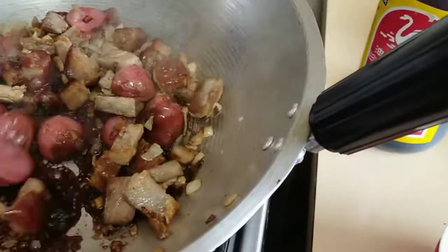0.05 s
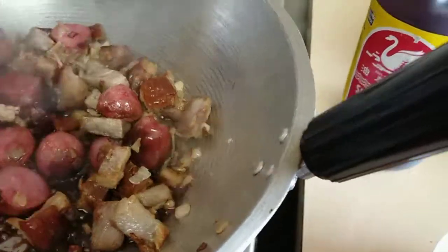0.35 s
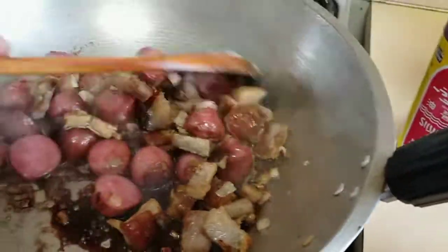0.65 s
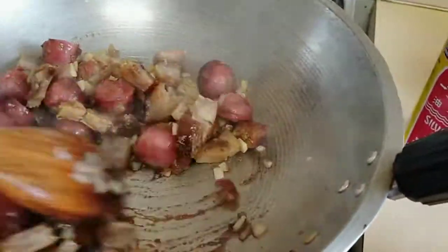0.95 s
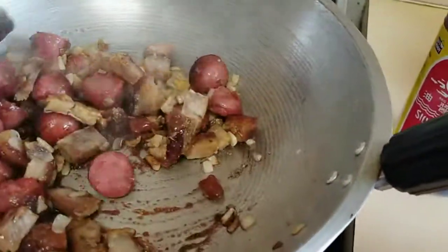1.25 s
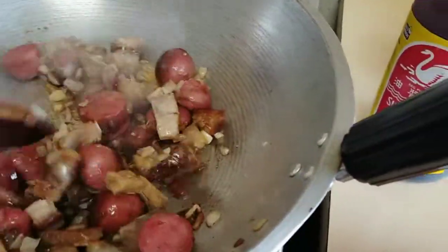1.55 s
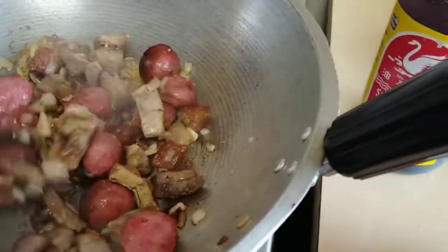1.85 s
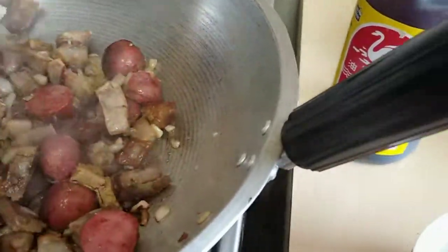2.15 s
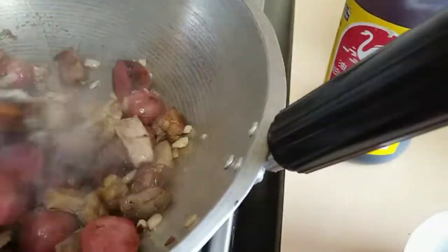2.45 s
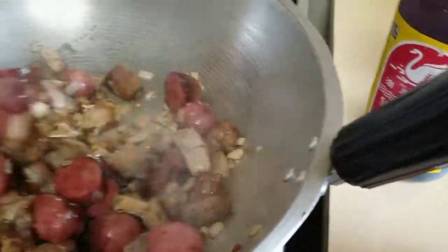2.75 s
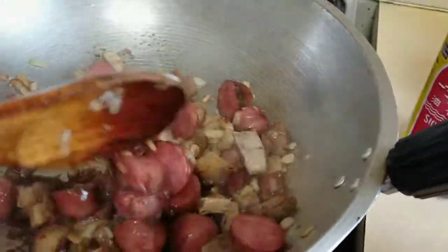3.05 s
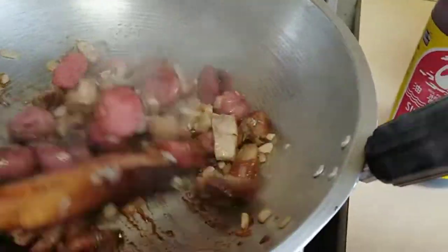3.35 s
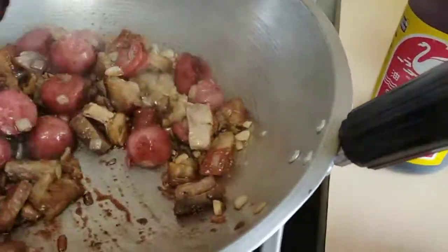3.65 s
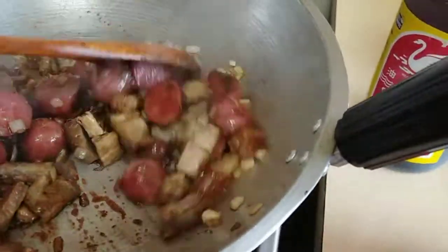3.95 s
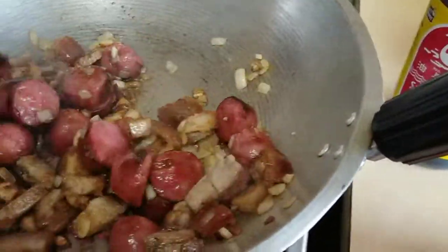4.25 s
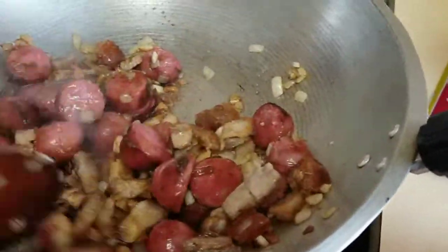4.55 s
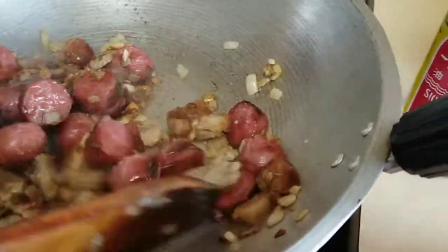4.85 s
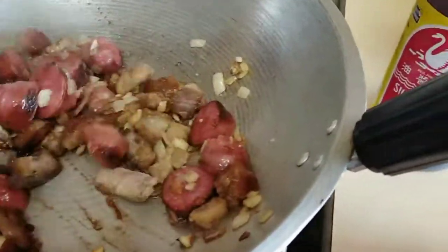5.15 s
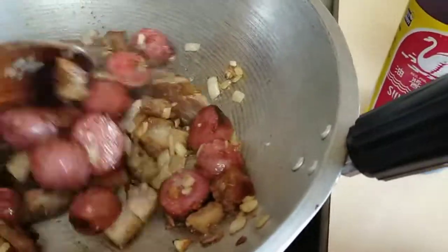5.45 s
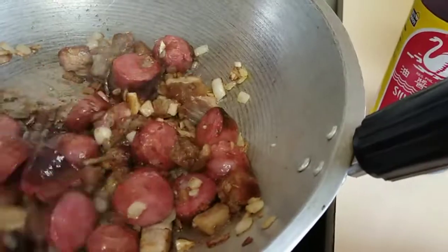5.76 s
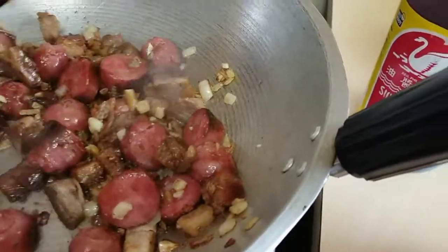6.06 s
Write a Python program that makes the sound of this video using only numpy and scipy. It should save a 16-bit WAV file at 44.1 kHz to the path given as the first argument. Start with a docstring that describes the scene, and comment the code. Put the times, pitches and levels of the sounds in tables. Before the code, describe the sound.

Close, slowly softening frying in a wok, with a wooden spatula stirring and clacking against the metal about twice a second.

```python
"""A small kitchen, a phone held close over a metal wok of frying meat, sausage and onion.
From the start, countless steam bubbles burst in the oil, and now and then a drop spits. From half a
second in, a wooden spatula knocks on the pan about twice a second and pushes the food along; the wok
rings briefly and rumbles on its burner. The frying dies down as the food is turned, and in the last
two seconds the spatula's edge rasps twice over bare metal. The house murmurs faintly throughout."""
import sys
import numpy as np
from scipy import signal
from scipy.fft import rfft, irfft, next_fast_len
from scipy.io import wavfile
from scipy.ndimage import uniform_filter1d

SR = 44100
rng = np.random.default_rng(int(sys.argv[2]) if len(sys.argv) > 2 else 0)


def materialize(psi):
    """Save the field psi as 16-bit PCM at rate SR to the path in sys.argv[1].

    A 1-D psi becomes a single channel; in a 2-D psi each row is a channel.
    """
    bounded = np.clip(np.atleast_2d(psi).T, -1, 1)
    quanta = np.round(bounded * 32767).astype(np.int16)
    wavfile.write(sys.argv[1], SR, quanta)


N = 277389
TIME = np.arange(N) / SR

# Source levels are relative, ahead of the microphone. Balance is left minus right.
# The frying dying down. Each row: time in seconds, crackle level in dB, fizz balance in dB.
FRYING_LEVELS = [(0.0, -32.5, 0), (0.52, -32.5, -2), (1.23, -33, 3.5), (1.54, -36, 1.5),
                 (2.35, -37.5, -0.5), (3.24, -38, 0), (3.36, -37.5, -0.5), (4.87, -39.5, 1),
                 (4.99, -39, -1), (6.29, -39.5, 2.5)]
# Fresh food meets hot metal and the fizz surges.
# Each row: start in seconds, length in seconds, boost in dB, shift to the left in dB.
FIZZ_SURGES = [(0.0, 0.055, 1, 0), (0.294, 0.22, 2, 0), (1.082, 0.3, 1, -1.5), (1.88, 0.12, 3, 0),
               (2.082, 0.38, 3, -0.5), (2.537, 0.23, 2.5, 0.5), (3.353, 0.63, 2, 0), (4.894, 0.11, 2, 2),
               (5.194, 0.22, 2.5, 1), (5.83, 0.22, 1.5, -2.5), (6.08, 0.15, 3.5, -2)]
# Large bubbles, then tiny ones. Each row: lower and upper band edge in Hz, bursts a second,
# spread of sizes in dB, direct sound against echo in dB, lag at the left port in ms.
LARGE_BUBBLES = [(20, 1950, 2200, 2, 1.5, 0.26), (1340, 3450, 3500, 1, -8.5, 0.32)]
TINY_BUBBLES = [(3470, 7100, 7000, 1.5, -6, 0.575), (6460, 9700, 7000, 2.6, -1.5, 0.552),
                (9250, 22600, 13000, 0.76, -5, 0.594)]
# The colour of bursting bubbles. Each row: frequency in Hz, level in dB.
BUBBLE_SPECTRUM = [(60, -61), (200, -44), (310, -17.5), (480, -15.5), (620, -6), (820, -4.5), (1150, 0.5),
                   (1400, -2.5), (2300, 0), (3200, 0), (3900, -2.5), (7500, -2.5), (10300, -9.5),
                   (15500, -11)]
# The hollow of the bowl, heard in the frying. Each row: centre in Hz, width in Hz, boost in dB.
BOWL_RESONANCES = [(630, 17, 8), (1056, 170, 2.5), (1755, 16, 2), (2465, 170, 2)]
# The spatula's blows. Each row: start in seconds, clack level in dB, hardness in Hz, ring of the low,
# middle, high and top modes in dB, t60 of the food's damping in seconds, bounce delay in seconds,
# bounce against first blow in dB, balance in dB.
SPATULA_KNOCKS = [ (0.4603, -27, 655, -55, -55, -60, -60, .5, 0.019, -4.5, 1.6),
                  (0.739, -30, 800, -52, -54, -60, -60, 0.46, 0.0083, -3.5, 1.6),
                  (1.2703, -19, 1180, -41, -48, -58, -60, .4, 0.0063, -13, 2.8),
                  (1.7070, -21.5, 2340, -37.5, -26.5, -25, -24, 0.26, 0.0051, -6, 4.2),
                  (2.1980, -33, 520, -49, -61, -60, -60, .5, .009, -8, 1),
                  (2.678, -22.5, 1100, -43, -46, -56, -60, 0.54, 0.0067, -19, 0.85),
                  (3.1875, -19, 2110, -40.5, -37, -29.5, -44, 1.4, .007, -9, 6.1),
                  (3.68, -23, 1180, -50, -62, -60, -60, .5, .007, -28, 1.4),
                  (4.393, -19.5, 2480, -35.5, -23.5, -35.5, -17.5, 2.1, .006, -6, 3.9),
                  (4.7960, -49.5, 338, -53, -49, -60, -60, 0.55, .02, 1, 1),
                  (5.256, -24, 1230, -42, -39, -58, -60, 1.3, .005, -5, 3.5),
                  (5.6935, -17.5, 3200, -50, -51, -58, -44, .3, .0065, -5.5, 5.5),
                  (6.1400, -51, 350, -60, -60, -58, -60, .5, .02, 3, 1)]
# Wood on metal, choked by the contact. Each row: frequency in Hz, level in dB, t60 in seconds.
CLACK_MODES = [(245, -12.5, 0.21), (658, -3.5, 0.093), (780, -25, 0.034), (1044, -13, 0.034),
               (1470, -51, 0.024), (2000, 8, 0.016), (2150, 0, 0.018), (2360, 5.5, 0.051),
               (2480, -20, 0.018), (3470, -22, 0.011)]
# The wok, damped by the food. Each row: frequency in Hz, level in dB, t60 in seconds.
WOK_MODES = [(116.3, -17, 0.92), (231, -2, 0.46), (317, -11.5, 0.97), (448, 1, 0.66), (606, -6.5, 0.54),
             (644, -5, 0.31), (724, 0.5, 0.28), (885, -3, 0.35), (961, 3, 0.37), (1378, 0, 0.23),
             (1560, -11, 0.088), (1846, 6.5, 0.44), (2020, -19, .13), (2310, -9, 0.091), (2372, -5, 0.17)]
# Drops that spit. Each row: start in seconds, level in dB, t60 in seconds, balance in dB.
SPITTING_DROPS = [(0.114, -8.5, .002, 1), (0.3638, -18, 0.0022, -5), (0.513, -22, .002, 0),
                  (1.9043, -17, .002, -2), (2.814, -23, .002, 1), (4.393, -19.5, 0.2, 3),
                  (4.854, -21, 0.0012, 2), (6.108, -26, .002, 0)]
# Pushing the food. Each row: start in seconds, length in seconds, rumble in dB, scrape in dB.
SPATULA_STROKES = [(-.05, 0.18, -57, -43.5), (.46, 0.15, -66, -46.5), (.74, 0.34, -77, -51.5),
                   (1.27, 0.095, -60, -42.5), (1.712, 0.17, -59, -48.5), (2.186, 0.064, -66, -52),
                   (2.505, .07, -73, -53), (2.677, 0.14, -62, -44), (3.145, 0.071, -57, -45),
                   (3.33, .12, -81, -56), (3.676, 0.19, -57.5, -49), (4.373, 0.16, -58.5, -47),
                   (4.79, 0.087, -60.5, -53), (5.263, 0.078, -56, -42.5), (5.685, 0.13, -53.5, -51),
                   (6.138, 0.079, -64, -49)]
# The colours of the scrape and of the wok on its burner. Each row: frequency in Hz, level in dB.
SCRAPE_SPECTRUM = [(60, -41), (170, -17.5), (290, 2.5), (450, -4), (900, 2), (2500, -24), (8000, -50)]
RUMBLE_SPECTRUM = [(20, -17), (50, -23), (68, -20), (81, 5.5), (97, -22), (114, -3), (150, -8.5),
                   (400, -44), (2000, -80)]
# The spatula's edge on bare metal. Each row: start in seconds, length in seconds, level in dB.
EDGE_RASPS = [(4.51, 0.041, -39), (5.35, 0.067, -41)]
# The phone's microphone ports, left then right. Each row: centre in Hz, width in Hz, gain in dB.
MIC_PORTS = [
    [(2295, 970, 6.5), (4610, 390, 2), (5887, 1310, 13.5), (9800, 4200, -4), (13830, 3400, 8.5)],
    [(5400, 400, 1.5), (6710, 1750, 10), (15970, 4800, 9)],
]


def sizzle(fizz_base_db=-29, reference_db=-31, fizz_follows=0.92):
    """Right under the phone, tiny bubbles fizz in the oil and fewer, larger ones crackle in the juices."""
    crackle_db, balance_db = curves(FRYING_LEVELS)
    fizz_db = fizz_base_db + fizz_follows * (crackle_db - reference_db)
    for start, length, boost_db, shift_db in FIZZ_SURGES:
        surge = swell(start, length, attack_s=0.071, t60=0.43)
        fizz_db += boost_db * surge
        balance_db += shift_db * surge
    flurry = wander(28.1) + wander(110)  # shared by bubbles of every size
    fizz = bubbles(TINY_BUBBLES, 0.2 * flurry, flicker_db=0.35, echo_t60=0.015)
    crackle = bubbles(LARGE_BUBBLES, 0.78 * flurry, flicker_db=0.56, echo_t60=0.052)
    # the longest waves of the crackle are the same at both ports
    crackle += shape(crackle[::-1] - crackle, lambda hz: 0.5 / (1 + (hz / 680) ** 4))
    return fizz * undb(fizz_db) * pan(balance_db + 0.48) + crackle * undb(crackle_db + 0.88)


def bubbles(bands, flurry_db, flicker_db, echo_t60):
    """Bursts all over the pan, each size in its own band; echoes off the bowl blur into a short hiss."""
    out = np.zeros((2, N))
    retained = fade(1 / SR, echo_t60) ** 2
    for low_hz, high_hz, rate, spread_db, direct_db, lag_ms in bands:
        bursts = clicks(rate, spread_db) * undb(flurry_db + flicker_db * wander(90))
        echo_energy = signal.lfilter([1 - retained], [1, -retained], bursts ** 2)
        echoes = np.sqrt(echo_energy) * rng.standard_normal((2, N))
        heard = unit(undb(direct_db) * arrive(bursts, lag_ms) + echoes)
        out += shape(heard, lambda hz: ((1 + (low_hz / hz) ** 8) * (1 + (hz / high_hz) ** 8)) ** -0.5)
    return unit(resonate(colour(out, BUBBLE_SPECTRUM), BOWL_RESONANCES))


def knocks(jolt_db=4, bass_cut_hz=130):
    """The spatula lands and bounces once. Food cushions most blows; bare metal clacks and rings."""
    clacks, rings = np.zeros((2, N)), np.zeros((2, N))
    clack_hz, wok_hz = np.array(CLACK_MODES)[:, 0], np.array(WOK_MODES)[:, 0]
    polarity = (-1) ** np.arange(len(WOK_MODES))
    for start, db, hardness_hz, *ring_db, food_t60, bounce_s, bounce_db, balance_db in SPATULA_KNOCKS:
        # a short contact passes high modes and gives the low ones less push
        ratio = clack_hz / hardness_hz
        clack = ring(CLACK_MODES, ratio / (1 + ratio ** 10))
        thud, lead_s = jolt(hardness_hz)
        for when, blow_db in ((start, db), (start + bounce_s, db + bounce_db)):
            add(clacks, when, undb(blow_db) * clack * pan(balance_db))
            add(clacks, when - lead_s, undb(blow_db + jolt_db) * thud * pan(balance_db))
        # the spot struck decides which of the wok's modes wake
        spot_db = np.interp(np.log(wok_hz), np.log([457, 960, 1850, 2420]), ring_db)
        ringing = ring(WOK_MODES, undb(spot_db) * polarity) * fade(TIME[:SR // 2], food_t60)
        add(rings, start, ringing * pan(balance_db - 3.5))
    clacks = shape(clacks, lambda hz: 1 / (1 + 1j * hz / 3800) ** 2)  # soften the treble
    heard = kitchen(clacks, lag_ms=0.25, room_db=-17) + kitchen(rings, lag_ms=0.25, room_db=-20)
    # air slips around the pan, so it radiates little bass
    return signal.sosfilt(signal.butter(2, bass_cut_hz, "high", fs=SR, output="sos"), heard)


def jolt(hardness_hz, soft_below_hz=1200, width_cycles=0.56):
    """A soft push jolts the whole pan, sending out one short wave. Returns the wave and its period."""
    period = 1 / (0.86 * hardness_hz)
    cycles = TIME[:SR // 2] / period - 1.25
    softness = min(soft_below_hz / hardness_hz, 1) ** 4
    return softness * np.cos(2 * np.pi * cycles) * np.exp(-(cycles / width_cycles) ** 2), period


def spits(bright_hz=9000):
    """Juice hits the hot metal and flashes to steam: a snap for a drop, a short hiss for a splash."""
    out, t = np.zeros((2, N)), TIME[:SR // 5]
    for start, db, t60, balance_db in SPITTING_DROPS:
        snap = rng.standard_normal(len(t)) * fade(t, t60)
        snap /= np.abs(snap).max()
        add(out, start, snap * undb(db + 5.5) * pan(balance_db))
    return shape(colour(out, BUBBLE_SPECTRUM), lambda hz: 1 / np.hypot(1, hz / bright_hz))


def stirring():
    """Wood sticks and slips over the pan, waking its modes, while the wok shudders on the burner."""
    shudder, push = np.zeros(N), np.zeros(N)
    for start, length, rumble_db, scrape_db in SPATULA_STROKES:
        shudder += undb(rumble_db) * swell(start, length, attack_s=0.064, t60=0.41)
        # the food slides on after the pan has settled
        push += undb(scrape_db) * swell(start, length, attack_s=0.05, t60=0.81)
    slips = clicks(rate=600, spread_db=0) * push
    body = signal.fftconvolve(slips, ring(WOK_MODES, np.ones(len(WOK_MODES))))[:N]
    scrape = undb(10.5) * colour(slips, SCRAPE_SPECTRUM) + undb(-46) * body
    rumble = unit(colour(rng.standard_normal(N), RUMBLE_SPECTRUM)) * shudder
    return kitchen(scrape + rumble, lag_ms=0.38, room_db=-15)


def rasps(thin_below_hz=1900):
    """The spatula's edge chatters on bare metal: a run of tiny clacks without body."""
    contact = sum(undb(db) * swell(start, length, attack_s=0.012, t60=0.1)
                  for start, length, db in EDGE_RASPS)
    clack_hz = np.array(CLACK_MODES)[:, 0]
    thin_clack = ring(CLACK_MODES, np.minimum(clack_hz / thin_below_hz, 1) ** 2)
    chatter = signal.fftconvolve(clicks(rate=600, spread_db=3.5), thin_clack)[:N]
    return kitchen(unit(chatter) * contact, lag_ms=0.31, room_db=-12)


def kitchen(x, lag_ms, room_db, t60=0.46, build_s=0.016, apart_hz=700):
    """Close, direct sound and the small room's short tail, whose long waves reach both ports alike."""
    t = TIME[:SR // 2]
    tails = rng.standard_normal((2, len(t))) * (1 - np.exp(-t / build_s)) * fade(t, t60)
    mid, side = undb(room_db) * unit(tails) / np.sqrt(len(t))
    side = shape(side, lambda hz: hz / np.hypot(hz, apart_hz))
    direct = arrive(x, lag_ms)
    return direct + signal.fftconvolve(direct, np.array([mid + side, mid - side]), axes=1)[:, :N]


def room_tone(db=-84):
    """Far behind the pan, the faint low murmur of the house."""
    return undb(db) * unit(colour(rng.standard_normal(N), [(20, 3), (120, 2), (1000, -30)]))


def arrive(x, lag_ms):
    """Direct sound reaches the right microphone port first."""
    left, right = np.broadcast_to(x, (2, N))
    return np.array([shape(left, lambda hz: np.exp(-2j * np.pi * hz * lag_ms / 1000)), right])


def ring(modes, gains):
    """Decaying modes after one blow, each with its own extra gain."""
    t = TIME[:SR // 2]
    return sum(gain * undb(db) * fade(t, t60) * np.sin(2 * np.pi * hz * t)
               for (hz, db, t60), gain in zip(modes, gains))


def clicks(rate, spread_db):
    """Random impulses, about rate a second; spread_db makes a few stand out."""
    fires = rng.random(N) < rate / SR
    size = np.minimum(rng.exponential(size=N), 6)
    return unit(fires * undb(spread_db * size) * rng.choice([-1, 1], N))


def wander(rate):
    """Random levels, each held 1 / rate seconds, smoothed twice."""
    hold = int(SR / rate)
    steps = np.repeat(rng.standard_normal(N // hold + 1), hold)
    return unit(uniform_filter1d(uniform_filter1d(steps, hold), hold)[:N])


def swell(start, length, attack_s, t60):
    """An envelope that rises, holds until its length is over and dies away."""
    rise = np.clip((TIME - start) / attack_s, 0, 1)
    return rise * fade(np.maximum(TIME - start - length, 0), t60)


def fade(t, t60):
    """Exponential decay by 60 dB in t60 seconds."""
    return np.exp(-np.log(1000) * t / t60)


def curves(table):
    """A timed table's columns, one value a sample."""
    times, *columns = np.transpose(table)
    return [np.interp(TIME, times, column) for column in columns]


def shape(x, response):
    """Filter by a function of frequency."""
    size = next_fast_len(x.shape[-1] + 4096)
    hz = np.maximum(np.fft.rfftfreq(size, 1 / SR), 1)
    return irfft(rfft(x, size) * response(hz), size)[..., :x.shape[-1]]


def colour(x, points):
    """Filter by a curve through (Hz, dB) points."""
    point_hz, db = np.transpose(points)
    return shape(x, lambda hz: undb(np.interp(np.log(hz), np.log(point_hz), db)))


def resonate(x, bumps):
    """Bell-shaped boosts and dips."""
    return shape(x, lambda hz: undb(sum(db / 2 ** ((2 * (hz - centre) / width) ** 2)
                                        for centre, width, db in bumps)))


def add(track, start, sound):
    """Mix a sound into a track at start seconds."""
    i = int(start * SR)
    track[..., i:i + sound.shape[-1]] += sound[..., :N - i]


def pan(balance_db):
    """Left and right gains for a level difference."""
    return undb(np.array([[0.5], [-0.5]]) * balance_db)


def undb(db):
    """Decibels to gain."""
    return 10 ** (np.asarray(db) / 20)


def unit(x):
    """Scale to rms 1."""
    return x / np.sqrt(np.mean(x ** 2))


def scene():
    """Everything that reaches the phone above the wok."""
    return sizzle() + spits() + knocks() + stirring() + rasps() + room_tone()


def record(dry, top_hz=15750):
    """Each microphone port adds its own resonances; the phone cuts the top."""
    ports = np.array([resonate(channel, bumps) for channel, bumps in zip(dry, MIC_PORTS)])
    return shape(ports, lambda hz: np.clip((top_hz - hz) / 100 + 1, 0, 1))


dry = scene()
out = record(dry)
materialize(out)
```